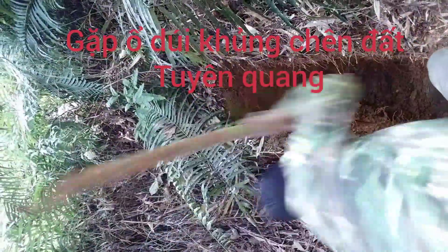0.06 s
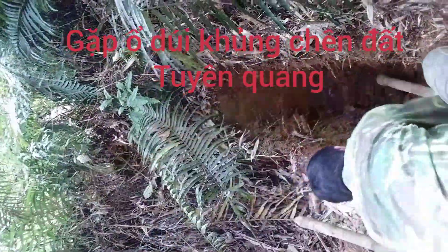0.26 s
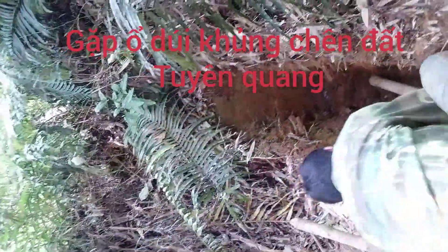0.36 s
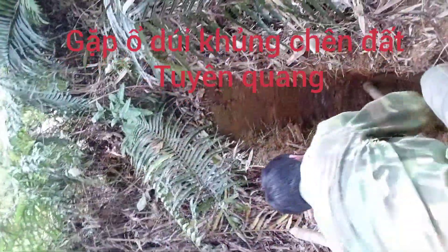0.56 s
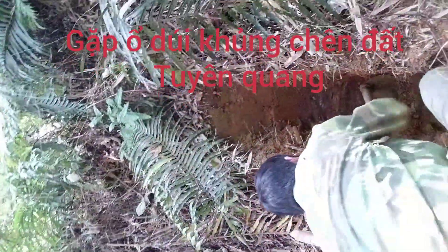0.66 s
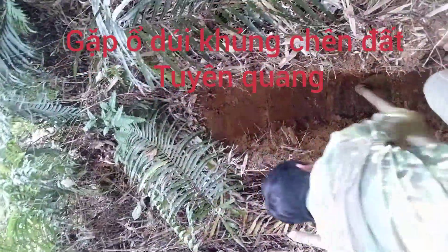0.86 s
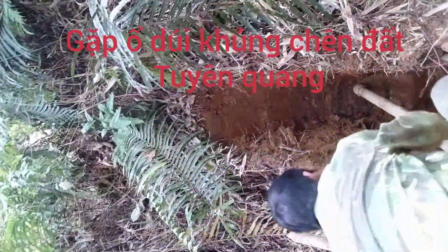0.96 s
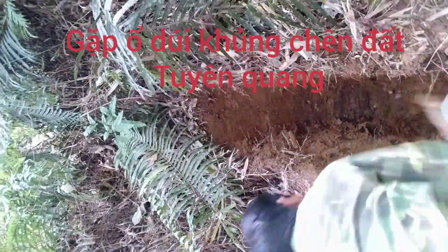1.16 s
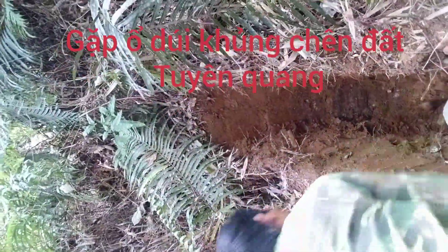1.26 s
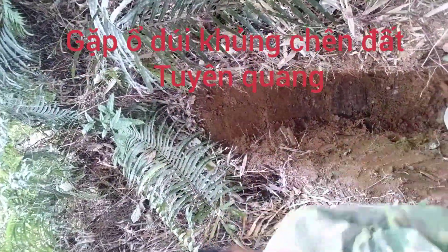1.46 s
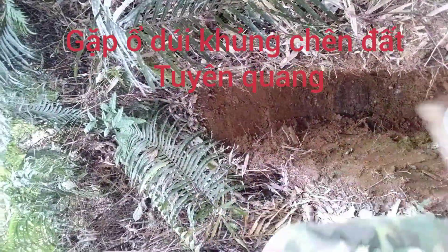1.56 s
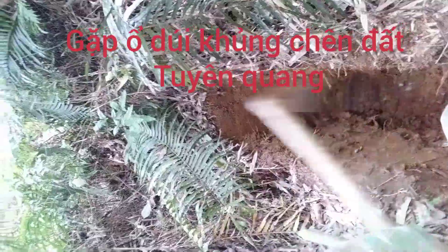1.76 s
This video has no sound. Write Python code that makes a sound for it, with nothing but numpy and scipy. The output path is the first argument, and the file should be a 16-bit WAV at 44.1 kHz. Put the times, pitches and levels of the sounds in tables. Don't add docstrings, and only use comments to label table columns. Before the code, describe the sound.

Hoe strikes in earth: one sharp cracking chop, then a weaker one with stones ticking the blade

```python
import sys
import numpy as np
from scipy import signal
from scipy.fft import rfft, irfft
from scipy.io import wavfile
from scipy.ndimage import uniform_filter1d

SR = 44100
rng = np.random.default_rng(int(sys.argv[2]) if len(sys.argv) > 2 else 0)


def decibels_to_gain(level_db):
    exponent = np.asarray(level_db, float) / 20
    return 10 ** exponent


def transcribe(u):
    v = np.clip(np.atleast_2d(u).T, -1, 1)
    q = np.round(v * 32767).astype(np.int16)
    wavfile.write(sys.argv[1], SR, q)


N = 79380


def colour(x, points):
    hz_points, db_points = np.array(points, float).T
    hz = np.maximum(np.arange(2049) * SR / 4096, 1)
    log_gain = np.interp(np.log(hz), np.log(hz_points), db_points) * np.log(10) / 20
    cepstrum = irfft(log_gain)
    cepstrum[1:2048] *= 2
    cepstrum[2049:] = 0
    response = irfft(np.exp(rfft(cepstrum)))
    return signal.fftconvolve(x, response / np.sqrt(np.sum(response ** 2)))[:N]


def blow(at, t60, rise):
    t = np.arange(N) / SR - at
    swell = np.exp(np.minimum(t, 0) / rise)
    decay = decibels_to_gain(-60 * np.maximum(t, 0) / t60)
    return np.where(t < 0, swell, decay)


def grains(scatter_db):
    strength_db = scatter_db * np.minimum(rng.exponential(size=N), 4)
    x = rng.standard_normal(N) * decibels_to_gain(strength_db)
    return x / x.std()


def walk(rate):
    hold = int(SR / rate)
    steps = np.repeat(rng.standard_normal(N // hold + 1), hold)
    x = uniform_filter1d(uniform_filter1d(steps, hold), hold)[:N]
    return x / x.std()


def ring(x, hz, t60):
    pole = np.exp(2j * np.pi * hz / SR - np.log(1000) / (t60 * SR))
    return signal.lfilter([1], [1, -pole], x).imag


# start in seconds, levels of crack, grit and clods in dB, grit fade (t60) in s.
CHOP_EVENTS = [
    (0.2389, -12.5, -16, -26, 0.17),
    (1.259, -15.5, -29, -43.5, 0.121),
]
# time in seconds, level in dB, contact in s.
FIRST_JOLTS = [
    (0.2386, -15.5, 0.00065),
    (0.2404, -8, 0.00031),
    (0.2447, -13.5, 0.00042),
    (0.2516, -9, 0.001),
    (.261, -19.5, 0.0013),
    (0.276, -20.5, 0.0014),
    (.29, -26.5, 0.0021),
]
SECOND_JOLTS = [
    (1.258, -20, 0.00059),
    (1.2606, -21.5, 0.00086),
    (1.273, -29.5, 0.00012),
    (1.289, -32.5, 0.0005),
    (1.315, -39.5, 0.0028),
]
# pitch in Hz, level in dB, fade (t60) in s.
FIRST_THUD = [(93, -1.5, 0.053), (142, -5.5, 0.065), (275, -3.5, 0.053), (352.4, -0.5, 0.067),
              (608, -13, 0.07), (796, -5.5, 0.02), (1065, -1.5, 0.074), (1297, 3, 0.03), (1450, -1, .04),
              (1850, -16, 0.034)]
SECOND_THUD = [(126.7, -28.5, 0.18), (309, -1.5, 0.036), (405, -5.5, 0.0375), (643, -2.5, 0.019),
               (999, -10, 0.072), (1482, 6.5, 0.046), (1830, -22, .03)]
# frequency in Hz, level in dB per Hz.
CRACK_COLOUR = [(500, -18.5), (1200, -4), (2500, -5.5), (4500, 1.5), (6500, -0.5), (9000, -16), (12500, -4),
                (15500, -7.5)]
# frequency in Hz, level in dB per Hz.
CLOD_COLOUR = [(100, -25.5), (350, -7), (700, -14.5), (1000, -9.5), (1250, -2), (1600, -13), (2500, -13.5),
               (5000, -35.5)]
ENTRY_S = 0.0019


def chops():
    cracks, sprays, clods, thuds = 0, 0, 0, 0
    all_jolts, all_modes = (FIRST_JOLTS, SECOND_JOLTS), (FIRST_THUD, SECOND_THUD)
    for (at, crack_db, grit_db, clod_db, grit_t60), jolts, modes in zip(CHOP_EVENTS, all_jolts, all_modes):
        entry = decibels_to_gain(-16) * blow(at - 0.002, 0.02, ENTRY_S)
        cracks = cracks + decibels_to_gain(crack_db) * (blow(at, 0.013, 0.0014) + entry)
        late_shower = decibels_to_gain(-24) * blow(at, 0.5, ENTRY_S)
        sprays = sprays + decibels_to_gain(grit_db) * (blow(at, grit_t60, ENTRY_S) + late_shower)
        clods = clods + decibels_to_gain(clod_db) * blow(at + 0.0027, 0.15, 0.002)
        push = 0
        t = np.arange(N) / SR
        for jolt_s, db, contact_s in jolts:
            bump = np.exp(-((t - jolt_s) / contact_s * 2) ** 2)
            push = push + decibels_to_gain(db) * bump / (contact_s * SR / 0.88)
        thuds = thuds + sum(decibels_to_gain(db) * ring(push, hz, t60) for hz, db, t60 in modes)
    thuds = signal.lfilter(*signal.butter(2, 99, "high", fs=SR), thuds)
    crack_sound = colour(grains(2.2) * cracks, CRACK_COLOUR)
    spray_sound = grit(grains(2.4) * sprays * decibels_to_gain(1.4 * walk(120)))
    clod_sound = colour(grains(3.7) * clods, CLOD_COLOUR)
    return thuds + crack_sound + spray_sound + clod_sound


# frequency in Hz, level in dB per Hz.
GRIT_COLOUR = [(300, -15), (1200, -7.5), (4000, -3.5), (6200, 1), (7900, -6), (8800, -19), (12000, -9),
               (15500, -15)]
# pitch in Hz, level in dB, fade (t60) in seconds.
BLADE_MODES = [(2696, -1.5, 0.022), (3717, 0.5, 0.014), (4250, -4.5, 0.006), (4897, 0, .015),
               (5530, -3.5, 0.02), (6100, -2, 0.0057), (7583, -4.5, 0.03), (11700, -4.5, 0.0076),
               (13500, -4, 0.014)]


def grit(x):
    hiss = colour(x, GRIT_COLOUR)
    rung = 0
    for hz, db, t60 in BLADE_MODES:
        tone = ring(hiss, hz, t60) / np.sqrt(t60 * SR / 28)
        rung = rung + decibels_to_gain(db + 3.0 * walk(90)) * tone
    return hiss + decibels_to_gain(-6.5) * rung / 3


# time in seconds, grit level in dB, clod level in dB, fade (t60) in seconds.
CRUMB_EVENTS = [(.015, -49, -53.5, 0.032), (0.053, -55, -80, 0.081), (0.116, -60, -75.5, 0.068),
                (.195, -49, -56.5, .06), (0.457, -58, -56.5, 0.053), (0.463, -61.5, -54.5, 0.15),
                (0.488, -59.5, -54.5, 0.12), (0.503, -72, -63, 0.023), (0.528, -73, -59, 0.017),
                (0.563, -54, -53.5, 0.094), (.584, -59.5, -57, 0.042), (0.606, -72.5, -59.5, 0.022),
                (0.663, -66, -66, 0.033), (0.741, -50.5, -82.5, 0.027), (0.854, -73, -92, 0.025),
                (.879, -64.5, -70.5, 0.089), (0.914, -61, -58, 0.22), (0.933, -52, -61.5, 0.048),
                (1.004, -57.5, -60, 0.027), (1.049, -64.5, -75.5, 0.014), (1.1666, -41.5, -80, 0.093),
                (1.172, -44.5, -58, 0.028), (1.268, -29, -30, 0.026), (1.209, -52, -57, 0.043),
                (1.299, -43, -38, 0.026), (1.3256, -44, -57.5, 0.017), (1.366, -58.5, -64, 0.047),
                (1.247, -73, -64, 0.018), (1.2536, -33, -65, .05), (1.277, -49, -50, 0.018),
                (.234, -29, -44.5, 0.046)]


def crumbs():
    rise_s = 0.0005
    fine = sum(decibels_to_gain(grit_db) * blow(at, t60, rise_s) for at, grit_db, _, t60 in CRUMB_EVENTS)
    clod = sum(decibels_to_gain(clod_db) * blow(at, t60, rise_s) for at, _, clod_db, t60 in CRUMB_EVENTS)
    patter_band = signal.butter(1, [2180, 8600], "band", fs=SR)
    patter = signal.lfilter(*patter_band, grains(2.2) * fine)
    return grit(patter) + colour(grains(0.75) * clod, CLOD_COLOUR)


# time in seconds, level in dB.
STONE_TAPS = [
    (1.1683, -37),
    (1.173, -51),
    (1.181, -47),
    (1.209, -60),
    (1.269, -37),
    (1.2748, -40),
    (1.284, -47),
    (1.3, -41),
    (1.004, -61),
]
# pitch in Hz, level in dB, fade (t60) in seconds.
TAP_MODES = [(1470, 0, 0.021), (2308, -9, 0.046), (3170, -12.5, 0.062), (3632, -9, 0.046),
             (4129, -6, 0.055), (4400, -8, 0.049), (4800, -19.5, 0.067), (5453, -10, 0.049),
             (6700, -10, 0.04), (7170, -10, 0.04), (7800, -19, 0.03)]


def taps():
    out = 0
    mixes = rng.standard_normal((len(STONE_TAPS), len(TAP_MODES)))
    for (at, db), mix in zip(STONE_TAPS, mixes):
        push = np.zeros(N)
        push[int(at * SR)] = decibels_to_gain(db)
        for (hz, mode_db, t60), change in zip(TAP_MODES, mix):
            level = decibels_to_gain(mode_db + 2.4 * change + 1.5 * walk(150))
            out = out + level * ring(push, hz, t60)
    return signal.sosfilt(signal.butter(3, 1250, "high", fs=SR, output="sos"), out)


# time in seconds, pitch in Hz,
# level in dB, fade (t60) in s.
DULL_BUMPS = [(.003, 320, -58, 0.067), (0.011, 900, -60.5, 0.15), (0.021, 1050, -66, 0.059),
              (.075, 200, -58, 0.067), (.095, 800, -62, 0.056), (0.122, 260, -55.5, 0.058),
              (0.122, 450, -60, .04), (0.189, 360, -60.5, .08), (.34, 250, -56, 0.11),
              (0.457, 1250, -54, 0.047), (.488, 1200, -55, 0.05), (.563, 1320, -50, .05),
              (.585, 1250, -54, 0.039), (0.741, 3520, -57, 0.021), (0.88, 1280, -64, .04),
              (0.929, 170, -65, 0.062), (1.191, 380, -58.5, 0.085), (1.26, 530, -36, .04),
              (1.505, 1300, -67.5, 0.062), (1.741, 1760, -72, 0.22), (.29, 1219, -45, .2)]


def bumps():
    t, out = np.arange(N) / SR, 0
    for at, hz, db, t60 in DULL_BUMPS:
        level = decibels_to_gain(db + 3.7 * walk(120)) * blow(at, t60, 0.0022)
        out = out + level * np.sin(2 * np.pi * hz * t + 1.3 * walk(hz / 4))
    return out


# time in seconds, pitch in Hz, level in
# dB, fade (t60) in seconds.
METAL_RINGS = [(.02, 15000, -40, .03), (.022, 11000, -47, .02), (.053, 5850, -39.5, 0.047),
               (.058, 7290, -38.5, 0.056), (.052, 6966, -49.5, .8), (.054, 13380, -33, 0.044),
               (.055, 10090, -47, 0.085), (.057, 11200, -38, .02), (.058, 12260, -46, .08),
               (.068, 13380, -43, 0.087), (.07, 12260, -36.5, 0.057), (.068, 5200, -49.5, 0.14),
               (.084, 7500, -51, .1), (.097, 14860, -48, 0.065), (.095, 12260, -47, 0.13),
               (.094, 10090, -52, .05), (.098, 13380, -43, .1), (.1, 7607, -44.5, 0.092),
               (.176, 11500, -56, .03), (.187, 5846, -46, .06), (.188, 13390, -37.5, .05),
               (.188, 12260, -54, 0.11), (.188, 7585, -45, .05), (.189, 15200, -51, .03),
               (.197, 4517, -53, .3), (.228, 13400, -43, .03), (.23, 6300, -47, .02),
               (.378, 13400, -45.5, .06), (.685, 1800, -72.5, 0.28), (0.74, 5860, -56, .01),
               (1.09, 12260, -70, .15), (1.178, 13200, -57.5, .03), (1.235, 13200, -65, .04),
               (1.29, 12000, -56, .12), (1.298, 5600, -44, .04), (1.298, 13500, -53, .05),
               (1.3, 15200, -50, .04), (1.326, 5443, -42.5, .03), (1.326, 7768, -47, .02),
               (1.37, 11900, -59, 0.058), (1.37, 13500, -59, .05), (1.372, 5490, -52, 0.036),
               (1.588, 11390, -67, 0.074), (1.59, 13370, -66, 0.087), (1.597, 5841, -65.5, .1),
               (1.59, 7289, -60, 0.082), (1.59, 14140, -69, .06)]
# time in seconds, level in dB, fade (t60) in seconds.
METAL_RATTLES = [(.001, -49.5, 0.092), (0.02, -36, 0.031), (0.031, -53, 0.055), (0.052, -38, 0.064),
                 (0.094, -49.5, 0.09), (0.176, -44, 0.03), (0.187, -41.5, 0.074), (0.226, -44, .05),
                 (0.379, -51.5, 0.05), (1.085, -62.5, 0.054), (1.178, -54, 0.048), (1.368, -58, 0.041),
                 (1.589, -62, .12)]
# frequency in Hz, level in dB per Hz.
RATTLE_COLOUR = [(1000, -26.5), (3000, -15), (6000, -1.5), (8800, -10.5), (11500, -3), (14000, 2.5),
                 (15800, -3.5)]


def jingles():
    t, rings = np.arange(N) / SR, 0
    for (at, hz, db, t60), turn in zip(METAL_RINGS, rng.random((len(METAL_RINGS), 1))):
        level = decibels_to_gain(db + 2.7 * walk(140)) * blow(at, t60, 0.0007)
        rings = rings + level * np.sin(2 * np.pi * (hz * t + turn) + 0.6 * walk(250))
    rattles = sum(decibels_to_gain(db) * blow(at, t60, 0.0008) for at, db, t60 in METAL_RATTLES)
    return rings + colour(grains(2.5) * rattles, RATTLE_COLOUR)


# time in seconds, hiss level in dB, low air rush level in dB.
RUSTLE_LEVELS = [(0, -56, -70), (.12, -58.5, -67), (.17, -60.5, -64), (.23, -53.5, -51.5), (.3, -56, -64),
                 (.45, -66, -80.5), (.83, -80.5, -109.5), (.95, -81.5, -85.5), (1.12, -74, -91.5),
                 (1.24, -64.5, -62.5), (1.4, -74, -84), (1.5, -69.5, -87.5), (1.8, -75, -86)]


def rustle():
    t = np.arange(N) / SR
    times, hiss_db, rush_db = np.array(RUSTLE_LEVELS, float).T
    hiss = colour(grains(1.0), GRIT_COLOUR) * decibels_to_gain(np.interp(t, times, hiss_db) + 2.2 * walk(60))
    rush_hz = 100
    rush_band = signal.butter(2, [rush_hz / 1.3, rush_hz * 1.6], "band", fs=SR)
    rush = signal.lfilter(*rush_band, rng.standard_normal(N))
    return hiss + rush / rush.std() * decibels_to_gain(np.interp(t, times, rush_db) + 2 * walk(35))


# frequency in Hz, level in dB per Hz.
WOODS_COLOUR = [(30, -6), (109, -4), (1350, -6), (2000, -14), (4700, -5.5), (7700, -12), (8900, -24.5),
                (12000, -13), (16000, -8.5)]


def forest():
    hiss = colour(rng.standard_normal(N), WOODS_COLOUR) * decibels_to_gain(-70.5 + 0.73 * walk(15))
    insects = ring(rng.standard_normal(N), 4700, 0.004)
    return hiss + insects / insects.std() * decibels_to_gain(-81 + 3.5 * walk(18))


def scene():
    digging = chops() + crumbs() + taps() + bumps()
    return np.tile(digging + jingles() + rustle() + forest(), (2, 1))


def roll_off(x):
    return signal.sosfilt(signal.butter(12, 17150, fs=SR, output="sos"), x)


def record(dry):
    x = signal.sosfilt(signal.butter(2, 45, "high", fs=SR, output="sos"), dry)
    x = signal.sosfilt(signal.ellip(6, 0.5, 45, 15900, fs=SR, output="sos"), x)
    return roll_off(x)


dry = scene()
out = record(dry)
transcribe(out)
```